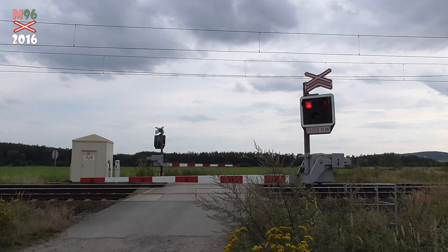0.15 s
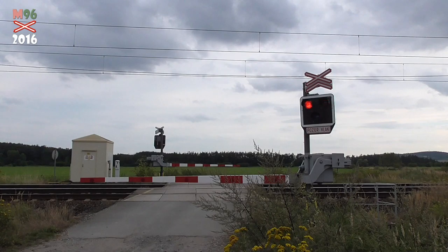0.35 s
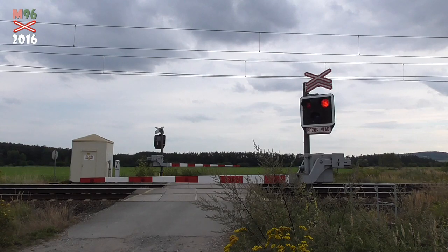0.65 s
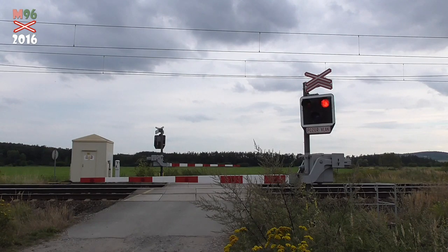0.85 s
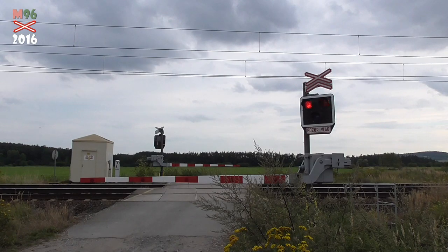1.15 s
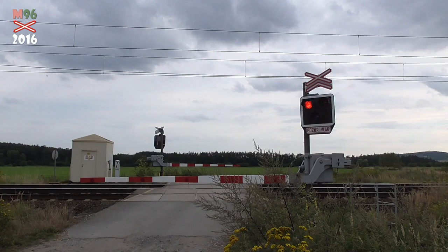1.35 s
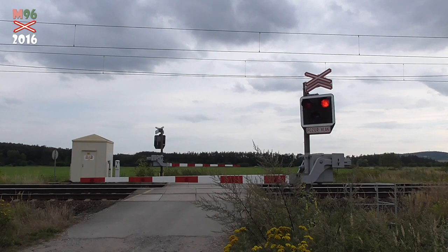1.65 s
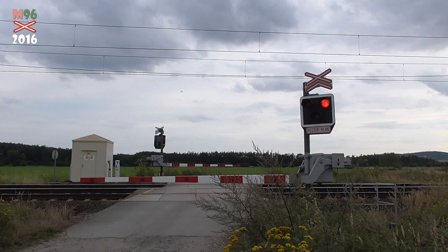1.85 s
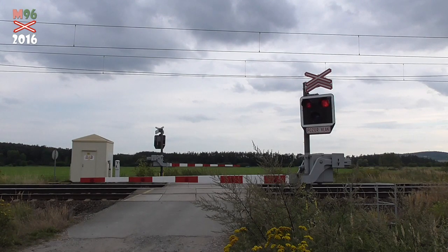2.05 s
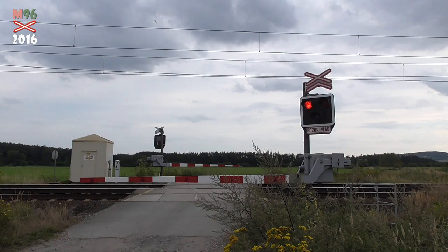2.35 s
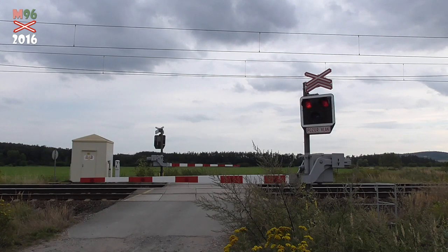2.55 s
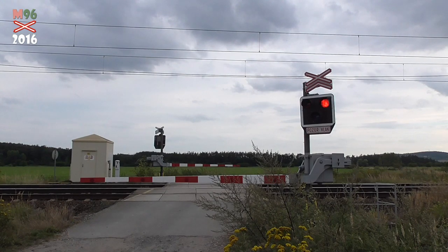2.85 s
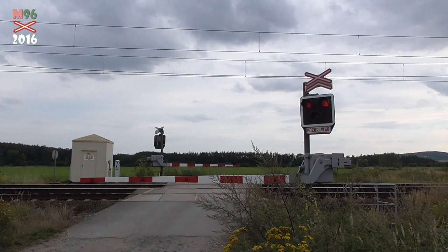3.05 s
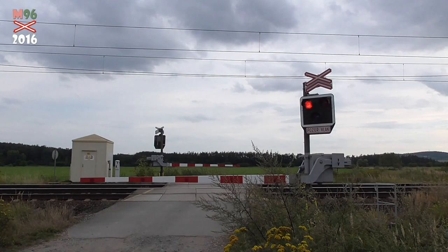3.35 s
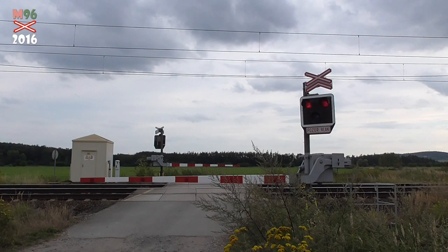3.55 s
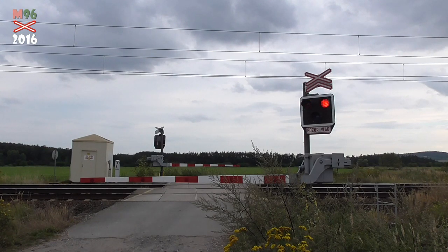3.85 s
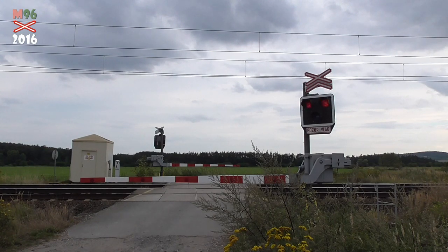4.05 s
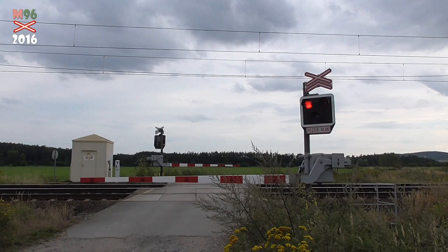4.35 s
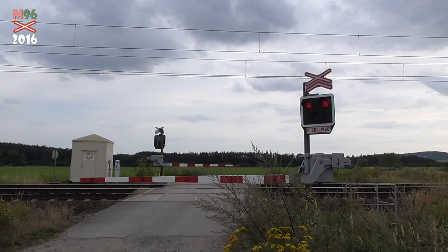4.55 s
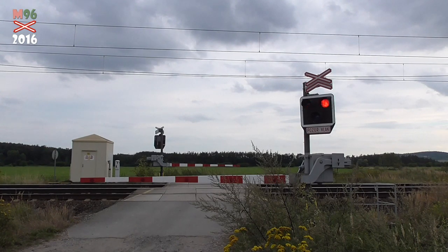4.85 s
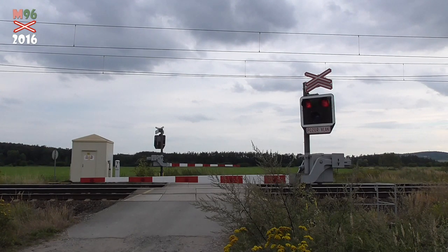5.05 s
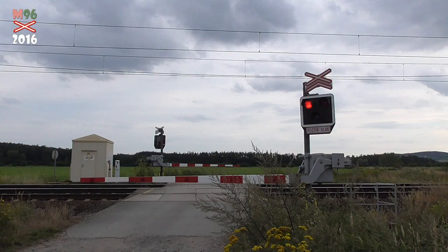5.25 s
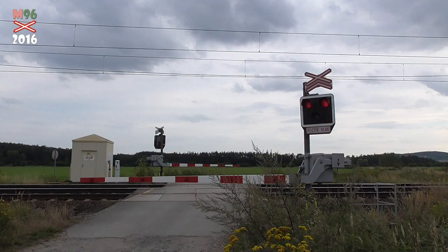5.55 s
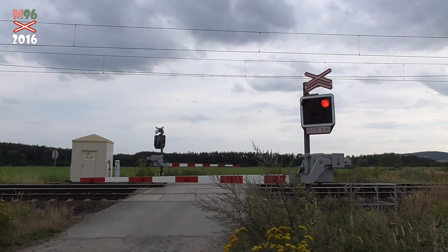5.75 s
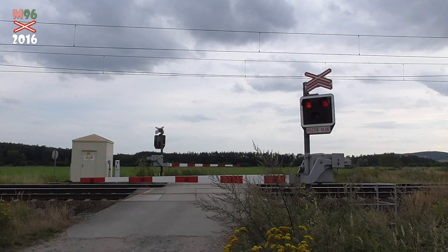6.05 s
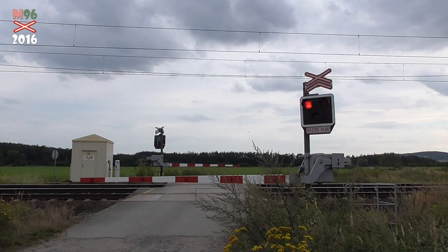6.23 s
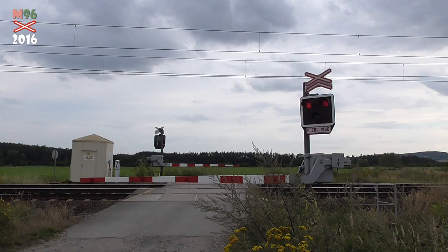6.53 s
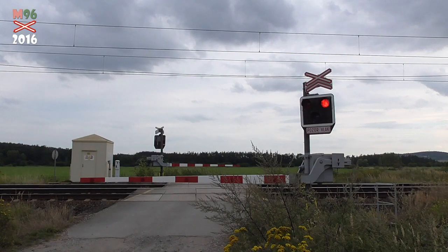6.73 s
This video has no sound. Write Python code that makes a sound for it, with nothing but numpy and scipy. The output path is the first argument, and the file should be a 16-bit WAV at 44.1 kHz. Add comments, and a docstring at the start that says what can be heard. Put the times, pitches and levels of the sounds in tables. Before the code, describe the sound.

Bush-crickets scrape fast, dry, high chirps in overlapping bouts over a soft road rush, as one vehicle slowly swells on the left.

```python
"""A summer field by a country level crossing. Three bush-crickets scrape their wings in double or triple
strokes near the microphone: uneven tooth clicks and scratch noise, coloured by each wing. Behind them lie a
blurred chorus and hiss of shaped noise, a thin whine, a low rumble and a faint hum. A distant road rushes as
noise, one vehicle swelling on the left. Dry resonant ticks sound midway and near the end, where a noisy rasp
also glides upward inside a rustle."""
import sys
import numpy as np
from scipy import signal
from scipy.fft import rfft, irfft
from scipy.io import wavfile

SR = 44100
rng = np.random.default_rng(int(sys.argv[2]) if len(sys.argv) > 2 else 0)


def put_to_file(sound):
    """Save the sound as 16-bit audio at rate SR, in the file named by the first command-line argument."""
    columns = np.atleast_2d(sound).T  # one column per channel
    safe = np.clip(columns, -1, 1)
    whole_steps = np.round(safe * 32767)
    wavfile.write(sys.argv[1], SR, whole_steps.astype(np.int16))


N = 303849

# microphone pair: pitch_hz, left_right_likeness (-1..1), left_lead_rad, left_minus_right_db
PORT_PAIR = [(40, .95, .2, 1.4), (95, .97, .2, 1.4), (130, .89, .22, 1.4), (290, .48, .22, 1.1),
             (480, .73, .6, 1.7), (800, .9, 1.1, 4.5), (1000, .87, 1.12, 5), (1250, .7, 1.35, 3.6),
             (1900, .52, 1.15, 3.5), (2250, .35, 1.8, 1.2), (2700, .1, .6, 3), (6000, .1, .6, .6),
             (8000, .3, 2.9, 2.5), (9500, .7, 3.05, 3), (10900, .7, 3.5, 0), (12400, .6, 3.8, -2),
             (13400, .9, 4.2, -2.5), (14100, .5, 5.8, 0.1)]


def from_db(db):
    """dB to amplitude gain."""
    return 10 ** (np.asarray(db) / 20)


def rms_one(x):
    """Scale to rms 1."""
    return x / np.sqrt(np.mean(x ** 2) + 1e-20)


def in_time(rows):
    """Columns of a curve at every sample, linear in time."""
    time_s, *columns = np.transpose(rows)
    return [np.interp(np.arange(N) / SR, time_s, column) for column in columns]


def in_hz(rows):
    """Columns of a table at every FFT bin, straight on a log-frequency axis."""
    hz, *columns = np.transpose(rows)
    bin_hz = np.arange(N // 2 + 1) * SR / N
    return [np.interp(np.log(bin_hz + 1), np.log(hz), column) for column in columns]


def drift(rate_hz):
    """Random wander of spread 1: noise through two equal poles at rate_hz, made every 40 samples."""
    step = 40
    r = np.exp(-2 * np.pi * step * rate_hz / SR)
    white = rng.standard_normal(N // step + 2002)
    slow = signal.lfilter([1], [1, -2 * r, r * r], white)[2000:]  # drop the filter's start
    return np.interp(np.arange(N) / step, np.arange(len(slow)), rms_one(slow))


def resonate(x, hz, width_hz):
    """Two-pole resonance, gain 1 on top."""
    r = np.exp(-np.pi * width_hz / SR)
    numerator = [(1 - r * r) / 2, 0, (r * r - 1) / 2]
    denominator = [1, -2 * r * np.cos(2 * np.pi * hz / SR), r * r]
    return signal.lfilter(numerator, denominator, x + 1e-18)


def at_ports(x, lead_rad=0.):
    """Two ports hear one sound with a phase lead and a level tilt that depend on pitch."""
    _, phase_rad, tilt_db = in_hz(PORT_PAIR)
    half = from_db(tilt_db / 2) * np.exp(.5j * (phase_rad + lead_rad))
    return irfft(rfft(x) * np.array([half, 1 / half]), N)


def coloured(spectrum, likeness):
    """Mid and side noises of one colour, balanced so that left and right have the given likeness."""
    alike = np.clip(likeness, 0, 1)
    noise = rfft(rng.standard_normal((2, N))) * from_db(in_hz(spectrum)[0])
    rms = np.sqrt(np.mean(irfft(noise[0], N) ** 2))
    shares = np.sqrt([(1 + alike) / 2, (1 - alike) / 2])
    return irfft(noise * shares, N) / rms


def field_noise(spectrum):
    """Noise arriving across the field, as the pair of ports hears it."""
    mid, side = coloured(spectrum, in_hz(PORT_PAIR)[0])
    return at_ports(mid) + at_ports(side) * [[1], [-1]]


def low_rumble():
    """Low shaped noise with a barely wavering level."""
    # pitch_hz, relative_db_per_hz
    spectrum = [(18, -37), (30, -15), (45, -5.5), (62, 3.5), (80, 5), (130, -12), (250, -41)]
    return from_db(-50 + 0.17 * drift(0.85)) * field_noise(spectrum)


def steady_lines(lines):
    """Sines wavering a little in level and phase."""
    t = np.arange(N) / SR
    total = np.zeros(N)
    for hz, rms_db in lines:
        gain = np.sqrt(2) * from_db(rms_db + 3.8 * drift(2.7))
        total += gain * np.sin(2 * np.pi * hz * t + 0.67 * drift(5.3))
    return total


def faint_hum():
    """Faint tonal lines inside the road's roar."""
    # pitch_hz, rms_db before wavering
    lines = [(601, -64.5), (1204, -62.5), (1793, -75)]
    return at_ports(steady_lines(lines))


def distant_road():
    """Road rush: shaped noise with a slowly wandering level."""
    # pitch_hz, relative_db_per_hz
    spectrum = [(40, -35), (130, -9), (310, -13.5), (520, -9), (650, -4), (960, -2), (1200, -17),
                (1500, -25.5), (1900, -22.5), (2300, -36), (3200, -47), (5000, -93.5)]
    return from_db(-42 + 0.5 * drift(1.0)) * field_noise(spectrum)


def nearing_vehicle():
    """Tyre roar: shaped noise following a level curve."""
    # pitch_hz, relative_db_per_hz
    spectrum = [(500, -34), (750, -7), (1000, -3.5), (1150, 0), (1300, -6), (1600, -21.5), (1900, -22),
                (2400, -35.5), (3300, -39.5), (3800, -36.5), (4300, -45), (6000, -63)]
    # time_s, level_db
    level_curve = [(0, -45.5), (1, -44.5), (2.4, -43.5), (4.2, -42.5), (5.9, -38), (6.89, -38.5)]
    return from_db(in_time(level_curve)[0]) * field_noise(spectrum)


def air_hiss():
    """Air and microphone hiss: noise nearly independent on the two sides, flickering in level."""
    # pitch_hz, relative_db_per_hz
    spectrum = [(1500, -51), (2500, 10.5), (3200, -8), (3800, -13), (5600, -38), (6400, -7), (7600, 5.5),
                (8400, 7.5), (12000, 12.5), (14400, 9.5), (15700, 6.5)]
    # pitch_hz, left_right_likeness
    likeness = [(2000, .05), (7000, .1), (12000, .1), (14400, .25), (15700, 0)]
    mid, side = coloured(spectrum, in_hz(likeness)[0])
    return from_db(-59.5 + 1.4 * drift(25)) * (mid + side * [[1], [-1]])


def thin_whine():
    """A thin high whine from two close tonal lines."""
    # pitch_hz, rms_db before wavering
    lines = [(7800, -87), (7826, -86)]
    return at_ports(steady_lines(lines), lead_rad=-1.04)


def far_chorus():
    """Far crickets blurred into shaped noise of flickering level."""
    # pitch_hz, relative_db_per_hz
    spectrum = [(6500, -29.5), (8600, -20), (9800, -5.5), (10700, -3.5), (11600, -23), (13500, -30),
                (15700, -21)]
    return from_db(-60 + 1.8 * drift(35)) * field_noise(spectrum)


def rustle():
    """A narrow noisy rasp gliding upward inside a puff of broad rustling."""
    peak_s, hold_s, swell_db_per_s, fade_db_per_s = 6.54, 0.021, 260, 700  # hold lasts this long each side
    rasp_hz, rise_hz_per_s, rasp_db, leaves_db = 2340, 2000, -53, -64.5  # rasp_hz at the peak
    t = np.arange(N) / SR - peak_s
    rise_db = swell_db_per_s * (t + hold_s)
    fall_db = fade_db_per_s * (hold_s - t)
    swell = from_db(np.minimum(0, np.minimum(rise_db, fall_db)))
    turn = 2 * np.pi * (rasp_hz * t + rise_hz_per_s * t ** 2 / 2)
    rasp = drift(210) * np.cos(turn) + drift(180) * np.sin(turn)
    leaves = rms_one(resonate(rng.standard_normal((2, N)), 4800, 4000))
    return swell * (from_db(rasp_db) * rasp + from_db(leaves_db) * leaves)


def grass_ticks():
    """Dry ticks: each a single snap through three resonances."""
    # start_s, relative_db, pitch_hz, width_hz (doubled in the third resonance), left_minus_right_db
    snaps = [(3.275, -46, 7300, 2400, -3), (6.278, -63, 4700, 2600, -2), (6.661, -45, 2290, 300, 2),
             (6.673, -57, 2320, 356, 2.5)]
    out = np.zeros((2, N))
    for start_s, level_db, hz, width_hz, pan_db in snaps:
        snap = np.zeros(N)
        snap[int(start_s * SR)] = SR / width_hz
        for pass_width_hz in (width_hz, width_hz, 2 * width_hz):
            snap = resonate(snap, hz, pass_width_hz)
        out += from_db([[level_db + pan_db / 2], [level_db - pan_db / 2]]) * snap
    return out


def grass_echo(x):
    """Stems and ground scatter a short blurred tail, another on each side."""
    t60_s, tail_db = .035, -16
    t = np.arange(int(.1 * SR)) / SR
    tail = rng.standard_normal((2, len(t))) * from_db(-60 * t / t60_s)
    tail *= from_db(tail_db) / np.sqrt(np.sum(tail ** 2, axis=1, keepdims=True))
    return x + signal.fftconvolve(x, tail, axes=1)[:, :N]


def bouts(rows, level_db):
    """Chirp times and levels of each bout: gaps steady or slowly lengthening, with random scatter."""
    jitter_ms, scatter_db = 1.1, 1.75
    k, chirps = np.arange(40), []
    for first_s, silent_s, gap_ms, growth_ms in rows:
        jitter, scatter = rng.standard_normal((2, len(k)))
        even_s = first_s + (gap_ms * k + growth_ms * k ** 2 / 2) / 1000
        chirp_s = even_s + jitter_ms * jitter / 1000
        chirp_db = level_db + scatter_db * scatter
        chirps += list(np.transpose([chirp_s, chirp_db])[even_s < silent_s])
    return chirps


def stroke_swell(chirps, strokes):
    """Loudness of the wing strokes: a squared-cosine swell for each."""
    t, swell = np.arange(N) / SR, np.zeros(N)
    offsets_s, half_lengths_s, stroke_db = np.transpose(strokes)
    for chirp_s, *chirp_db in chirps:
        for centre, half, level_db in zip(chirp_s + offsets_s, half_lengths_s, stroke_db + chirp_db):
            near = slice(max(0, int((centre - half) * SR)), max(0, int((centre + half) * SR)))
            swell[near] += from_db(level_db) * np.cos(np.pi / 2 * (t[near] - centre) / half) ** 2
    return swell


def cricket(chirps, strokes, wing, habit):
    """A scraper runs over the file's teeth: uneven clicks under each stroke's swell, ringing the wing."""
    teeth_per_s, lead_rad = habit
    scratch_early_s = .004  # the broad scratch peaks ahead of the ringing teeth
    t = np.arange(N) / SR
    swell = stroke_swell(chirps, strokes)
    travel = np.cumsum(teeth_per_s / SR * from_db(2.5 * drift(150)))
    teeth = np.diff(np.floor(travel), prepend=0) * from_db(rng.normal(0, 1.1, N))
    click_swell = np.interp(t - scratch_early_s / 2, t, swell)
    scratch_swell = np.interp(t + scratch_early_s / 2, t, swell)
    # teeth ring mostly the wing's main peak; friction between them scratches its whole range
    colour = from_db(in_hz(wing)[0])
    clicks = rfft(teeth / np.std(teeth) * click_swell) * rms_one(colour ** 2)
    scratch = rfft(rng.standard_normal(N) * scratch_swell) * rms_one(colour)
    return at_ports(irfft(clicks + 0.82 * scratch, N), lead_rad)


def low_singer():
    """The lowest wing: double strokes and a faint third, in bouts that slow."""
    # first_chirp_s, silent_s, first_gap_ms, gap_growth_ms per chirp
    bout_rows = [(-0.006, 1.21, 106.4, 0.02), (1.897, 4.15, 101.2, 0.326), (4.68, 6.93, 103.2, 0.162)]
    # offset_s from the chirp's time, half_length_s, relative_db
    strokes = [(0, .013, 1), (.032, .017, 0), (.064, .016, -20)]
    # wing colour: pitch_hz, relative_db_per_hz (doubled for the teeth)
    wing = [(7000, -44), (8650, -13), (9300, -8.5), (9800, -3.5), (10050, -3.5), (10300, -2.5), (10700, -4),
            (11300, -10), (12400, -26), (14000, -24)]
    # mean pace before wander: teeth_per_s; extra left lead from where it sits: lead_rad
    habit = (600, -0.08)
    return cricket(bouts(bout_rows, -46), strokes, wing, habit)


def mid_singer():
    """The middle wing: fewer teeth per second, double strokes and a faint third, in bouts."""
    # first_chirp_s, silent_s, first_gap_ms, gap_growth_ms per chirp
    bout_rows = [(0.529, 2.54, 96.27, 0.15), (3.246, 5.73, 94.5, 0.23), (6.343, 6.87, 95.7, 0)]
    # offset_s from the chirp's time, half_length_s, relative_db
    strokes = [(0, .014, 0), (.033, .018, 0), (.066, .016, -22)]
    # wing colour: pitch_hz, relative_db_per_hz (doubled for the teeth)
    wing = [(7000, -39), (8900, -15), (9900, -8.5), (10600, -4), (10880, -2), (11050, -2.5), (11250, -5.5),
            (11350, -11), (11900, -6), (12200, -6), (12450, -19), (13500, -18), (14400, -20), (15700, -26)]
    # mean pace before wander: teeth_per_s; extra left lead from where it sits: lead_rad
    habit = (430, 0.2)
    return cricket(bouts(bout_rows, -45), strokes, wing, habit)


def high_singer():
    """The highest wing: sparse chirps of three strokes, each with its own level."""
    # chirp_s, first_stroke_db, second_stroke_db, third_stroke_db
    chirps = [(0.332, -71, -46, -45), (1.165, -58, -45, -45), (2.074, -45, -48, -50),
              (2.954, -66, -46, -44.5), (3.754, -56, -48, -46), (4.59, -62, -47, -45),
              (5.469, -52, -43.5, -44), (6.399, -54, -46, -47)]
    # offset_s from the chirp's time, half_length_s, relative_db
    strokes = [(-.031, .012, 0), (0, .013, 0), (.032, .013, 0)]
    # wing colour: pitch_hz, relative_db_per_hz (doubled for the teeth)
    wing = [(8500, -26), (10000, 2.5), (11200, 1), (12400, -1), (13100, 1.5), (13600, -3), (14100, -18),
            (14700, -20), (15700, -28)]
    # mean pace before wander: teeth_per_s; extra left lead from where it sits: lead_rad
    habit = (620, .7)
    return cricket(chirps, strokes, wing, habit)


def scene():
    """Rumble, road, hiss and chorus under the small grass sounds and the near singers."""
    background = low_rumble() + faint_hum() + distant_road() + nearing_vehicle()
    background += air_hiss() + thin_whine() + far_chorus()
    singers = low_singer() + mid_singer() + high_singer()
    return background + rustle() + grass_echo(grass_ticks() + singers)


def record(dry):
    """The top is cut steeply by an elliptic low-pass."""
    cutoff_hz, ripple_db, stop_db = 15760, .3, 70
    low_pass = signal.ellip(14, ripple_db, stop_db, cutoff_hz, fs=SR, output="sos")
    return signal.sosfilt(low_pass, dry)


dry = scene()
out = record(dry)
put_to_file(out)
```